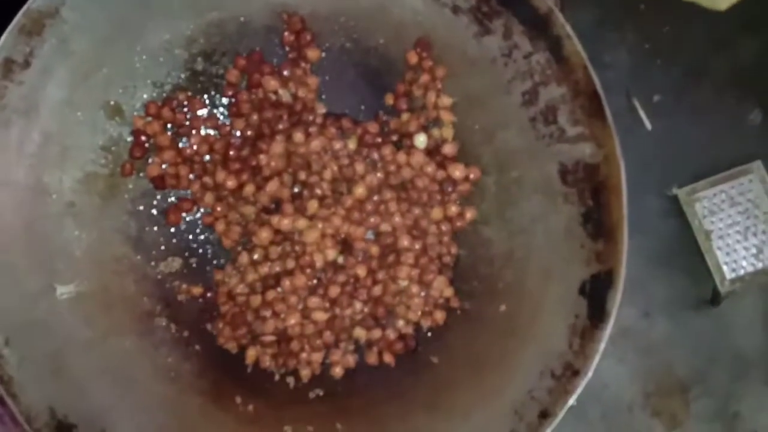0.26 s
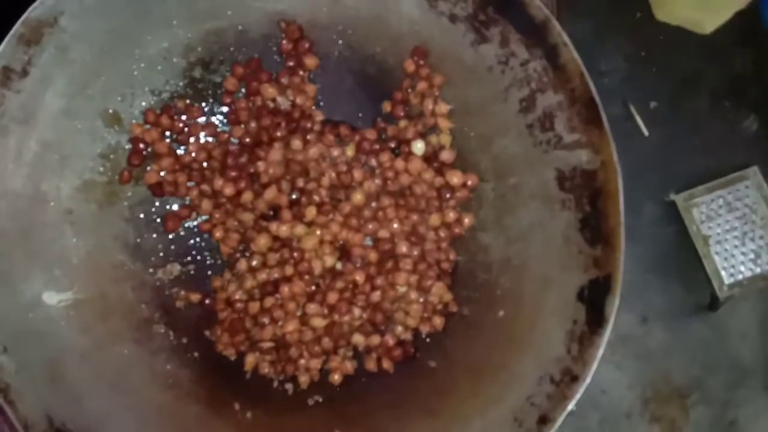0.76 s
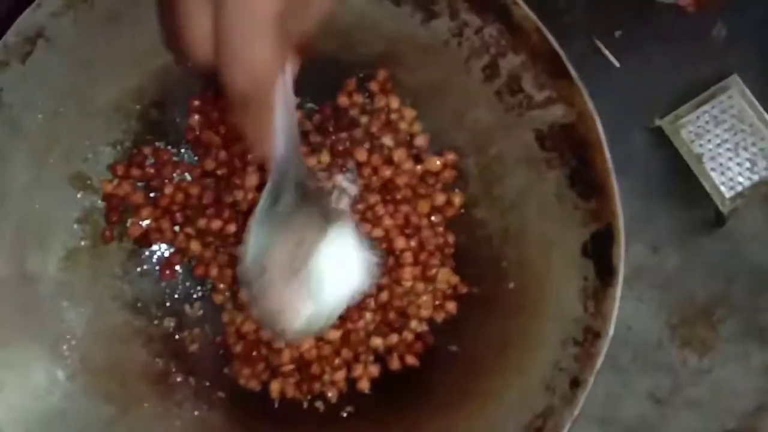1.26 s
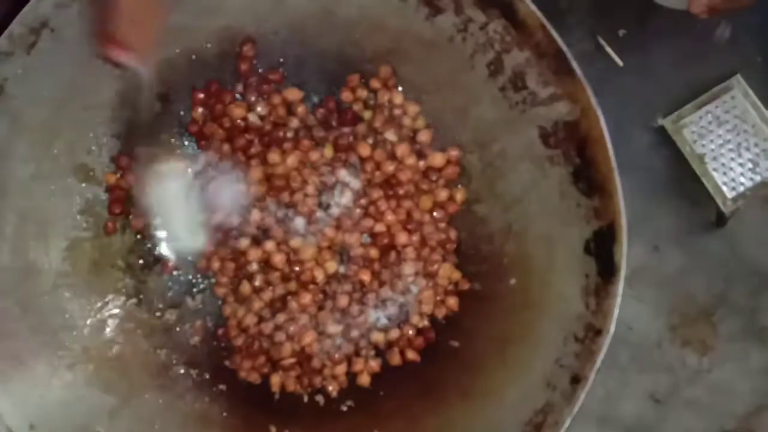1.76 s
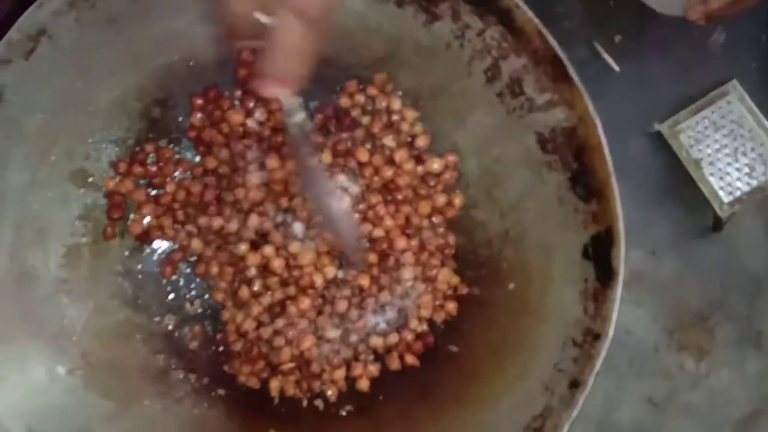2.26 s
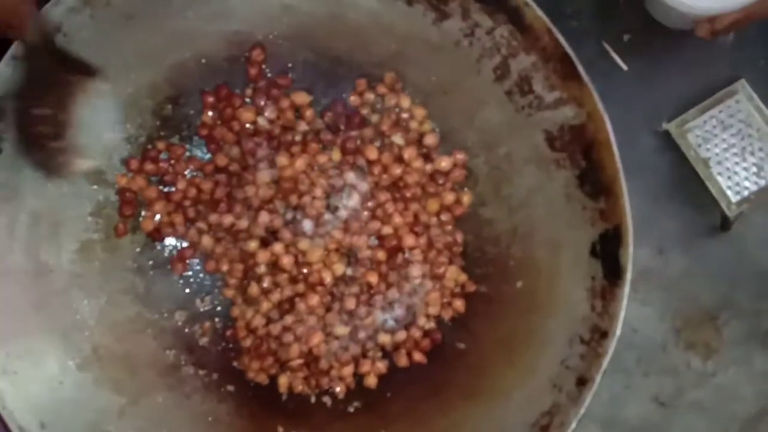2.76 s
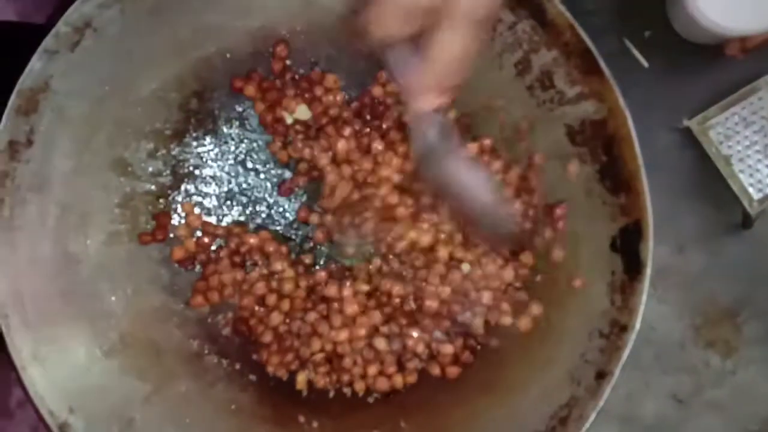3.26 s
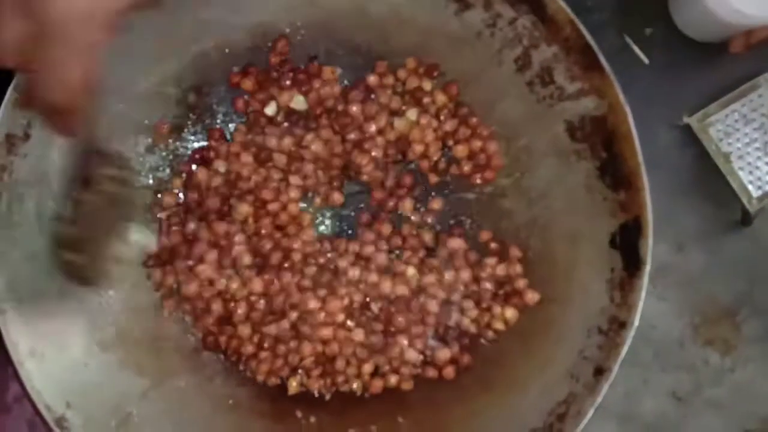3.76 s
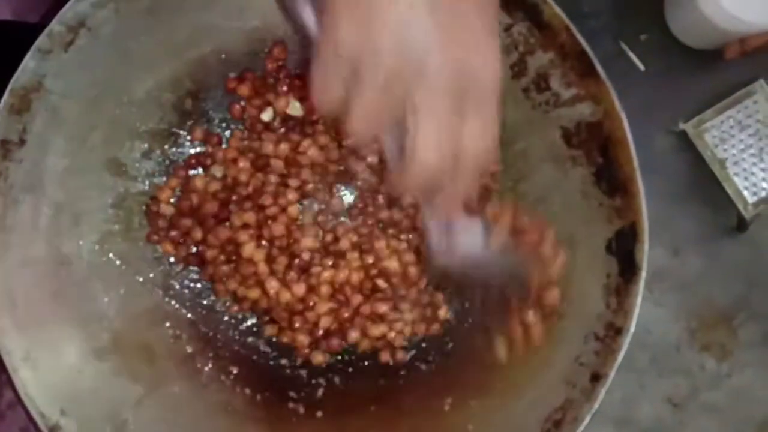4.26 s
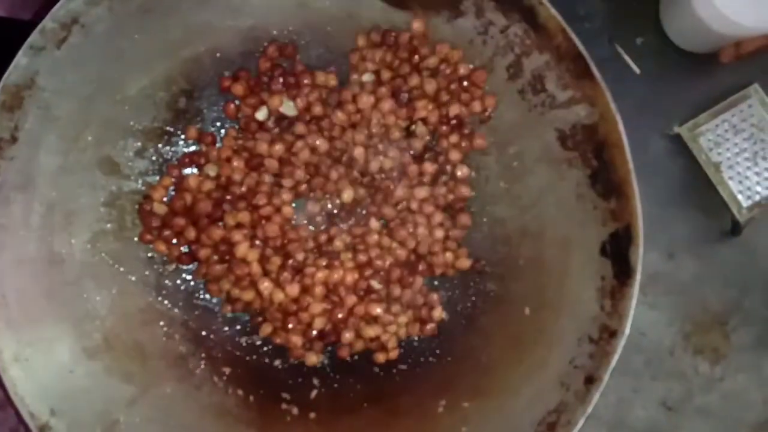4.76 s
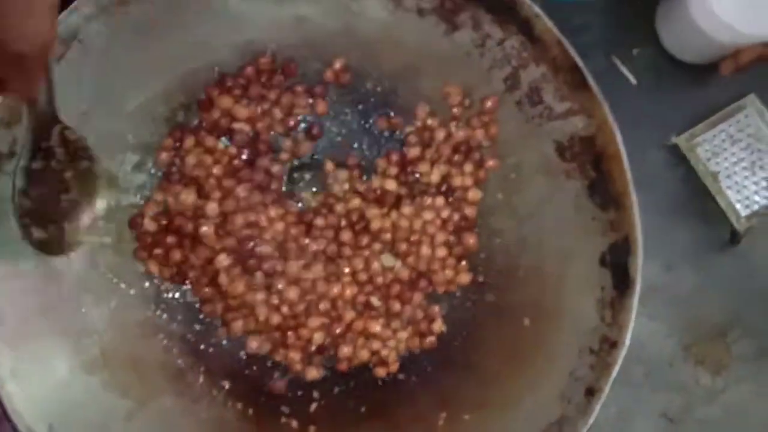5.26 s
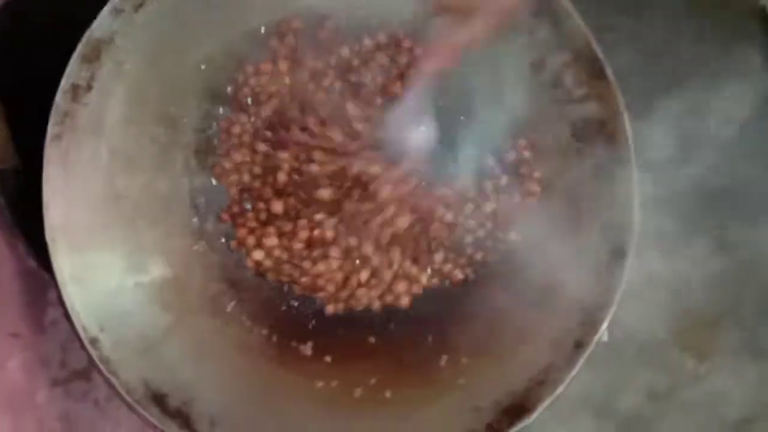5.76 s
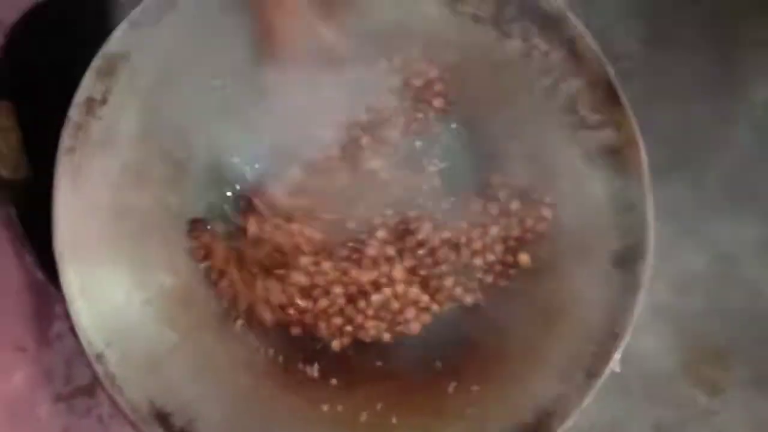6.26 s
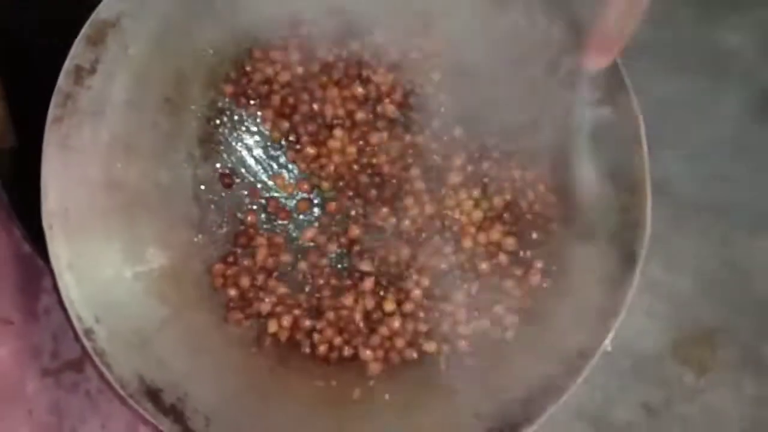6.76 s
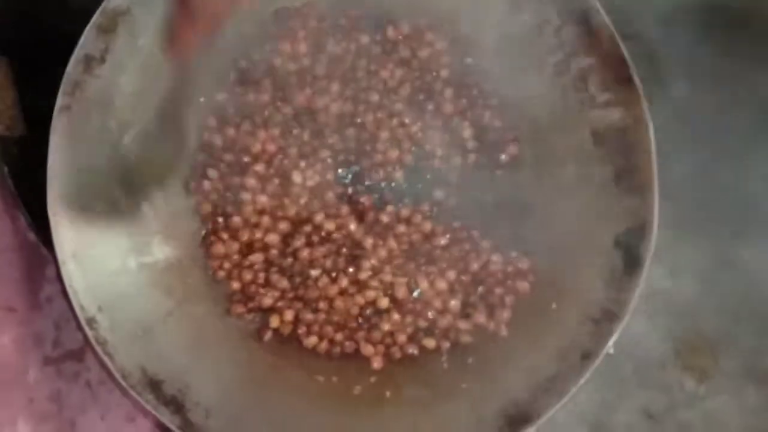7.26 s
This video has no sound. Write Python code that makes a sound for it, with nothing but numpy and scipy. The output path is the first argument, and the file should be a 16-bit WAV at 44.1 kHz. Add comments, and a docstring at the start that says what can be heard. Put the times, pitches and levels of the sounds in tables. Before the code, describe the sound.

Chickpeas sizzle steadily in hot, spitting oil while a spoon occasionally scrapes and clinks against the metal pan.

```python
"""Soaked chickpeas sizzle in hot oil in a steel pan. From the start, steam bubbles burst densely, the
burner rumbles and oil spits. Near 0.7 s the close microphone moves, which changes the sizzle's colour,
and a low hum first swells. From 2.5 s a stirring spoon scrapes now and then, and from 3.2 s the pan
knocks on its stand. The spoon clinks on the steel at 4.5 s, the microphone moves again at 5.4 s,
and the spoon clinks once more at 6.5 s."""
import sys
import numpy as np
from scipy import signal
from scipy.fft import rfft, irfft, next_fast_len
from scipy.io import wavfile
from scipy.ndimage import uniform_filter1d, minimum_filter1d, map_coordinates

SR = 44100
rng = np.random.default_rng(int(sys.argv[2]) if len(sys.argv) > 2 else 0)


def transcribe(u):
    """Save the signal u as a 16-bit wav file named by the first command-line argument.

    u: samples, shape (n,) or (channels, n), limited to [-1, 1]; the rate is SR.
    q: integer samples, one column per channel.
    """
    v = np.clip(np.atleast_2d(u).T, -1, 1)
    q = np.round(v * 32767).astype(np.int16)
    wavfile.write(sys.argv[1], SR, q)


N = 331632

# how loud the sizzle is: t/s, hiss level/dB, drone relative to hiss/dB, fizz relative to hiss/dB
SIZZLE_LEVELS = [(0, -25.5, -13.5, -2.5), (.3, -28.5, -13, -3.5), (.6, -25.5, -14.5, -3),
                 (.67, -26, -16, -2), (.69, -24.5, -10.5, -10), (.95, -22, -13, -10),
                 (1.2, -25.5, -12.5, -8), (1.5, -23.5, -13, -8), (1.9, -24, -11.5, -8),
                 (2.37, -22, -12.5, -8.5), (2.9, -21.5, -12.5, -7), (3.2, -22, -15, -7),
                 (3.8, -22, -14.5, -6), (4.4, -22.5, -12.5, -7), (5.03, -21, -13.5, -7.5),
                 (5.4, -22.5, -13.5, -5), (5.42, -22.5, -12.5, -8), (5.7, -24, -11.5, -5.5),
                 (6.3, -22.5, -14, -5), (7.1, -23.5, -10.5, -3.5), (7.4, -23, -11, -4),
                 (7.52, -24.5, -7.5, -3)]
# colour (strong and weak pitches) of the hiss at each microphone position: f/Hz, relative level/dB
FIRST_HISS = [(1350, -58), (2300, -17), (2810, -6.5), (3060, -8), (3250, -5.5), (4100, -2), (4390, -5),
              (4960, -0.5), (6330, 0), (7400, -4), (8700, -17), (11300, -48), (19100, -120)]
SECOND_HISS = [(1350, -40), (2300, -8.5), (2500, -11), (3320, -7.5), (4010, -1), (4800, 0), (5330, -3),
               (5830, 1), (6160, -1), (6700, -11.5), (7200, -7), (8090, -17), (8700, -15), (11300, -46),
               (19100, -120)]
THIRD_HISS = [(1350, -48), (2300, -18), (2720, -10.5), (2990, -12.5), (3320, -5.5), (3650, -10.5),
              (3860, -5), (3990, -8), (4220, -5), (5240, -9.5), (5960, -2.5), (6200, -1), (6700, -6),
              (7320, -4.5), (8700, -20.5), (11300, -50), (19100, -120)]
# colours of the low pan drone and the high fizz, one list per position: f/Hz, relative level/dB
DRONE_COLOURS = [
    [(400, -45), (600, -22), (1050, -13), (1300, -4), (1500, -6), (1900, -10), (2350, -9)],
    [(400, -45), (600, -16), (880, -13), (1250, -3.5), (1600, -5), (1880, -7), (2350, -4)],
    [(400, -20.5), (600, -10), (880, -10), (1350, -3), (1600, -2.5), (1820, -7), (2010, -2.5), (2350, -8)],
]
FIZZ_COLOURS = [
    [(8500, -1), (11100, -4), (12400, -7), (13900, -9)],
    [(8500, -1), (9500, -1.5), (12400, -9), (13900, -15)],
    [(8500, 1), (9300, 1.5), (12500, -4.5), (13900, -4.5)],
]
# tones of the pan, rung by the frying: f/Hz, width/Hz, boost/dB
PAN_TONES = [(393, 16, 4), (437, 20, 5), (652, 20, 10), (815, 40, 6), (945, 30, 5), (1245, 70, 7),
             (1600, 50, 3)]
# the microphone's opening lifts the highest fizz: f/Hz, boost/dB
PORT_BOOST = [(13900, 0), (14500, 9), (14620, 14), (15500, 15)]
# brief dips (below 0) and surges of sizzle and burner: t/s, change before scaling/dB, width/s
LEVEL_DIPS = [(.065, -2.5, .04), (.105, 3, 0.031), (.18, -6, .06), (.22, 2, .05), (.297, -1.5, .06),
              (.416, 1.5, 0.081), (.47, -3.5, 0.043), (.659, -3.5, 0.034), (.705, 1.5, 0.034),
              (.815, -3.5, 0.068), (.883, 3, 0.061), (1.01, -2, .04), (1.04, 3, 0.028), (1.08, -5.5, 0.045),
              (1.15, -7, 0.036), (1.18, 2.5, .03), (1.21, -4.5, 0.031), (1.255, 1, 0.04),
              (1.327, -6, 0.047), (1.43, -2, .05), (1.477, 1, .04), (1.52, -3, 0.044), (1.625, -7, 0.028),
              (2.12, -3, 0.027), (2.28, -1, 0.1), (2.37, 3, 0.092), (2.43, -4, 0.11), (2.59, 1.1, 0.073),
              (2.774, -4, 0.079), (2.887, 1.8, 0.035), (3.198, -0.5, 0.046), (3.284, 0.5, .06),
              (3.4, -1.5, 0.04), (3.452, 1, 0.045), (3.745, -1.5, 0.032), (3.775, 0, 0.029),
              (3.885, -0.5, 0.033), (4.25, 1.1, 0.095), (4.49, -6, 0.05), (4.704, -3.5, 0.038),
              (4.834, -4, .07), (4.918, -1.5, 0.042), (4.969, -7.5, 0.039), (5.15, -1.5, .04),
              (5.245, -3, 0.064), (5.32, 1.5, 0.045), (5.525, -2.5, 0.062), (5.586, 3, 0.034),
              (5.622, -4, 0.055), (6.092, -3.5, 0.049), (6.157, 1.5, .04), (6.2, -2.5, 0.044),
              (6.495, -3, 0.045), (6.783, 0, 0.031), (6.93, -3, .05), (6.98, 0.5, 0.056), (7.128, -3, 0.03)]
# how loud the burner is: t/s, rumble level/dB, flame level/dB
BURNER_LEVELS = [(0, -49, -46), (.24, -55, -66), (.31, -69, -66), (.65, -69, -68), (.72, -57.5, -54.5),
                 (1.1, -61, -61.5), (1.7, -64.5, -60), (2.05, -62.5, -63), (2.45, -69, -56.5),
                 (2.75, -59, -54), (3.5, -65.5, -57.5), (4.05, -56, -56), (4.9, -60, -59.5),
                 (5.25, -62, -57), (5.45, -53.5, -56.5), (5.85, -47, -52.5), (6.1, -48, -52.5),
                 (6.4, -57.5, -56), (6.9, -55, -57), (7.52, -57, -53)]
# colours of the burner's rumble and flame noise: f/Hz, relative level/dB
RUMBLE_COLOUR = [(20, -24), (45, -22), (62, -14), (76, -5), (88, -10), (100, -3), (108, -6), (119, -1),
                 (145, -7), (157, -1), (175, -6), (215, -18), (300, -60)]
FLAME_COLOUR = [(130, -13), (215, -2.5), (409, 1.5), (443, 3), (560, -6), (620, -2), (810, -23),
                (1360, -120)]
# the flame flares (above 0) or falters: t/s, rumble change/dB, flame change/dB
FLAME_FLARES = [(.05, -2, 2), (.77, 5, 2), (.82, -1, -4), (.92, 12, -2), (1.15, -7, -1), (1.5, 6, -1),
                (1.68, -2, -10), (1.99, 1, 8), (2.07, 5, -3), (2.3, 2, 5), (2.43, -5, -3), (2.61, 13, 5.5),
                (2.79, 1, -6), (2.89, -1, 5), (2.93, -7, -10), (2.97, -3, 3), (3.06, -1, -12), (3.15, 3, 0),
                (3.57, -8, 0), (3.77, -6, -8), (4.19, -6, -2), (4.36, 3, 2), (4.56, 15.5, 5), (4.64, 7, 2),
                (4.75, 9, 3), (4.9, 8, 1), (4.98, -8, -4), (5.05, -1, 13), (5.13, 8, 13), (5.25, -8, -5),
                (5.32, 5, 3), (5.78, -1, -6), (5.96, -8, 1), (6.47, -7, 6), (6.55, 4, 8), (6.74, 6, -1),
                (6.89, -6, -6), (6.99, 2, 3), (7.2, -1, 4), (7.31, -3, -5), (7.41, 3, 3)]
# the loudest oil spits: t/s, level before filtering/dB, rough pitch/Hz
BIG_SPITS = [(.0882, -8.5, 7000), (.0998, -14, 5860), (.1087, -12, 4010), (.135, -14, 5860),
             (.1658, -14, 5770), (.2099, -11, 4170), (.2208, -16, 6370), (.2799, -11, 4440),
             (.3307, -13, 5380), (.4218, -8, 6120), (.4863, -8, 6030), (.5357, -12, 5260),
             (.6752, -13, 6300), (.747, -11, 4500), (.7619, -8, 4100), (.8, -4.5, 5370), (.9789, -10, 5300),
             (.9979, -9, 4130), (1.0469, -11, 5300), (1.1293, -9, 4260), (1.2492, -9, 5640),
             (1.4093, -12, 4640), (1.4732, -6, 4060), (1.5048, -8, 5600), (1.5351, -12, 4260),
             (1.7473, -17, 4010), (1.8344, -5.5, 4570), (1.8984, -10, 4130), (1.9773, -8, 3570),
             (2.0131, -12, 3900), (2.2565, -8, 4700), (2.4076, -5, 4770), (2.7576, -11, 5000),
             (2.8181, -5, 4960), (2.9201, -5, 5400), (3.0197, -9, 5990), (3.143, -9, 4350),
             (3.1777, -8.5, 4100), (3.565, -9, 5950), (3.616, -2, 5510), (3.6477, -11, 4520),
             (3.7313, -8, 5860), (3.7449, -7, 5400), (4.111, -6, 4070), (4.3247, -10, 5680),
             (4.548, -4.5, 4100), (4.6788, -9, 5600), (4.779, -12, 4780), (4.8259, -11, 4600),
             (5.1262, -9, 5850), (5.2207, -9, 5770), (5.2834, -13, 5560), (5.4785, -10, 6160),
             (5.5556, -11, 6230), (5.5871, -5.5, 6070), (5.684, -12.5, 6530), (5.9363, -7, 6290),
             (6.0655, -10, 6160), (7.1621, -15, 3570)]
# swells of the hum: start t/s, length/s, f/Hz, top level/dB
HUM_SWELLS = [(0.678, 0.14, 184, -49), (0.803, .24, 188.5, -41.5), (.95, 0.17, 187, -52),
              (1.17, 0.11, 164, -58), (2.56, .16, 159.5, -54), (3.81, 0.23, 159, -54),
              (3.977, .24, 183, -48), (4.27, 0.12, 185, -38.5), (4.386, .085, 184, -46),
              (6.5, 0.17, 190, -51.5)]
# spoon strokes: start t/s, length/s, rasp f/Hz, rasp level/dB, bowl tone f/Hz, bowl tone level/dB
SPOON_STROKES = [(2.526, 0.11, 4200, -32, 1290, -45), (2.86, 0.064, 4600, -31, 1510, -38),
                 (4.499, 0.074, 4180, -24, 1270, -38), (4.564, .13, 4380, -23, 1223, -29),
                 (5.402, 0.071, 4560, -23.5, 1300, -35.5), (6.522, 0.15, 4400, -28.5, 1320, -43),
                 (7.234, 0.09, 4060, -29.5, 1304, -36), (7.302, 0.077, 4330, -38, 1560, -35),
                 (7.316, 0.17, 4200, -25.5, 2010, -38)]
# ringing tones of the spoon, and of the pan on its stand: f/Hz, relative level/dB, time to fade 60 dB/s
SPOON_TONES = [(1217, -20.5, 0.056), (2110, -26, 0.045), (3910, -11, 0.066), (4070, 5, 0.022),
               (4700, -8, .03), (4830, -5, 0.027), (6730, -10, 0.029), (7150, -12, 0.026)]
STAND_TONES = [(110, -19, 0.14), (285, -3, 0.22), (450, -3, 0.19), (496, 3, 0.11)]
# hits of pan on stand, and of spoon on pan with its bounces: t/s, level added to each tone/dB
PAN_HITS = [(3.19, -42.5), (4.535, -42), (5.03, -57), (5.8, -46), (6.005, -31), (6.56, -44), (7.18, -46)]
SPOON_HITS = [(4.4597, -1), (4.4665, -23), (6.4652, -3.5), (6.4682, -9), (6.472, -6.5)]

MOVES_S = (0.68, 5.41)  # when the microphone moves
TIME = np.arange(N) / SR


def amp(db):
    """Turn decibels into a gain to multiply by."""
    return 10 ** (np.asarray(db) / 20)


def unit(x):
    """Scale a signal to an average power of 1."""
    return x / np.sqrt(np.mean(x ** 2) + 1e-20)


def along(points, hz):
    """Read between (f/Hz, value) points on a log frequency axis."""
    f, value = np.transpose(points)
    return np.interp(np.log(hz + 1), np.log(f + 1), value)


def curves(rows):
    """One value per sample for each column after the time."""
    times, *columns = np.transpose(rows)
    return [np.interp(TIME, times, column) for column in columns]


def wobble(rate):
    """A smooth curve through `rate` random points a second."""
    return map_coordinates(rng.standard_normal(int(N * rate / SR) + 4), [TIME * rate])


def filtered(x, response):
    """Multiply each frequency in x by the gain response(f)."""
    size = next_fast_len(N + SR // 2)
    return irfft(rfft(x, size) * response(np.fft.rfftfreq(size, 1 / SR)), size)[..., :N]


def bumps(times, heights, width_s):
    """Smooth bumps on a flat line; widths are at half height."""
    t = np.arange(0, N + 64, 64) / SR
    hills = np.exp(-4 * np.log(2) * ((t[:, None] - times) / width_s) ** 2)
    return np.interp(TIME, t, hills @ heights)


def patchy(depth_db):
    """White noise with random louder and softer patches in time and pitch."""
    spectrum = signal.stft(rng.standard_normal(N), nperseg=256)[2]
    patches = unit(uniform_filter1d(rng.standard_normal(spectrum.shape), size=8, axis=0))
    patches = unit(uniform_filter1d(patches, size=8, axis=1))
    return unit(signal.istft(spectrum * amp(depth_db * patches), nperseg=256)[1][:N])


def bursts(rate, spread_db):
    """Random clicks of uneven size, about `rate` a second, each a very quick rising sweep."""
    hits = rng.random(N) < rate / SR
    sizes = amp(spread_db * np.minimum(rng.exponential(size=N), 3))
    sweep = lambda f: np.exp(-1j * np.pi * f * f * 2.5e-7)  # higher pitches come later
    return unit(filtered(hits * rng.choice([-1, 1], N) * sizes, sweep))


def boiling(click_db, clump_db):
    """Hiss with bursting bubbles on top, coming in clumps."""
    bubbles = patchy(depth_db=1.5) + amp(click_db) * bursts(rate=700, spread_db=5)
    clumps = 0.39 * wobble(35) + wobble(80) + 1.4 * wobble(160)
    return bubbles * amp(clump_db * clumps)


def sizzle():
    """Steam bubbles make a low pan drone, a hiss and a high fizz, coloured by the microphone's place."""
    level_db, drone_db, fizz_db = curves(SIZZLE_LEVELS)
    dip_db = bumps(*np.transpose(LEVEL_DIPS))
    levels = [level_db + drone_db + 0.89 * dip_db + 1.07 * wobble(14),
              level_db + 0.83 * dip_db,
              level_db + fizz_db + 0.89 * dip_db + 0.67 * wobble(14)]
    boil = boiling(click_db=-5.5, clump_db=0.54)
    spray = boiling(click_db=1.0, clump_db=0.74) + 0.99 * boil
    ring = lambda f: 1 + sum((amp(db) - 1) / (1 + (2 * (f - hz) / width) ** 2)
                             for hz, width, db in PAN_TONES)
    drone_hz, hiss_hz, fizz_hz = 360, 2350, 8600  # where each band starts
    colours = zip(DRONE_COLOURS, (FIRST_HISS, SECOND_HISS, THIRD_HISS), FIZZ_COLOURS)
    out = np.zeros(N)
    for position, (low, middle, top) in enumerate(colours):
        here = np.searchsorted(MOVES_S, TIME) == position
        drone = filtered(boil, lambda f: amp(along(low, f)) * ring(f) * (f > drone_hz) * (f < hiss_hz))
        hiss = filtered(boil, lambda f: amp(along(middle, f)) * (f >= hiss_hz) * (f < fizz_hz))
        fizz = filtered(spray, lambda f: amp(along(top, f) + along(PORT_BOOST, f)) * (f >= fizz_hz))
        for band, db in zip((drone, hiss, fizz), levels):
            out[here] += amp(db[here]) * unit(band[here])
    return out


def burner():
    """The swirling flame makes a low rumble and a higher rush; both gust and flare."""
    times, *flares = np.transpose(FLAME_FLARES)
    dip_db = bumps(*np.transpose(LEVEL_DIPS))
    gusts_db, dip_shares = (0.6, 1.5), (0.78, 0.9)  # each pair: rumble, flame
    bands = zip(curves(BURNER_LEVELS), flares, gusts_db, dip_shares, (RUMBLE_COLOUR, FLAME_COLOUR))
    out = np.zeros(N)
    for level_db, flare_db, gust_db, share, colour in bands:
        noise = unit(filtered(rng.standard_normal(N), lambda f: amp(along(colour, f))))
        change_db = bumps(times, flare_db, width_s=0.054) + share * dip_db + gust_db * wobble(15)
        out += amp(level_db + change_db) * noise
    return out


def oil_spits(small_count=40, small_db=-15, small_hz=5200, rise_s=0.000097, fade_s=0.0035):
    """Each droplet bursts as a short rising chirp with a crack; smaller ones come at random."""
    out, t = np.zeros(N + SR), np.arange(300) / SR
    when, size, pitch = rng.random((3, small_count))
    small_spits = np.c_[.01 + when * N / SR, small_db + 6 * (size - .5), small_hz * 1.6 ** (pitch - .5)]
    shape = amp(-60 * t / fade_s) * (1 - np.exp(-t / rise_s))
    shape /= shape.max()
    for start, db, hz in [*BIG_SPITS, *small_spits]:
        chirp = np.sin(2 * np.pi * hz * t * (0.913 + 80 * t))
        crack = 0.32 * rng.standard_normal(len(t))
        out[round((start - .0004) * SR):][:len(t)] += amp(db) * shape * (chirp + crack)
    # tiny drops make no bass; the very top is softened too
    return filtered(out[:N], lambda f: 1 / (1 + (2600 / (f + 1)) ** 6) / (1 + (f / 11000) ** 4))


def hum(waver=0.0047):
    """A pure low tone swells and dies away several times, its pitch wavering slightly."""
    out = np.zeros(N)
    wavering_time = np.cumsum(1 + waver * wobble(15)) / SR
    for start, length, hz, db in HUM_SWELLS:
        swell = np.abs(np.sin(np.pi * np.clip((TIME - start) / length, 0, 1))) ** 0.98
        out += swell * amp(db) * np.sqrt(2) * np.sin(2 * np.pi * hz * wavering_time)
    return out


def spoon_scrapes():
    """Rubbing makes the spoon rasp and sing a little, and rings one tone of the bowl."""
    peak = lambda f, hz, width: 1 / np.sqrt(1 + (2 * (f - hz) / width) ** 4)
    sings = lambda f: 1 + 1.5 * sum(peak(f, hz, 1.7 / fade_s) for hz, _, fade_s in SPOON_TONES)
    grit = bursts(rate=4000, spread_db=-1.5)
    out = np.zeros(N)
    for start, length, rasp_hz, rasp_db, tone_hz, tone_db in SPOON_STROKES:
        stroke = np.sqrt(np.sin(np.pi * np.clip((TIME - start) / length, 0, 1)))
        rasp = unit(filtered(grit, lambda f: peak(f, rasp_hz, width=880) * sings(f)))
        tone = unit(filtered(grit, lambda f: peak(f, tone_hz, width=96)))
        out += stroke * (amp(rasp_db) * rasp + amp(tone_db) * tone)
    return out


def struck(hits, tones):
    """Each hit rings the same fading tones, at slightly different strengths."""
    out, t = np.zeros(N + SR), np.arange(SR // 4) / SR
    rise = 1 - np.exp(-t * tones[0][0])  # builds over about one cycle of the lowest tone
    for start, db in hits:
        ring = sum(amp(level + rng.normal(0, 0.72) - 60 * t / fade_s) * np.sin(2 * np.pi * hz * t)
                   for hz, level, fade_s in tones)
        out[round(start * SR):][:len(t)] += amp(db) * ring * rise
    return out[:N]


def pan_knocks():
    """The pan bumps its stand with a dull, low ring."""
    return struck(PAN_HITS, STAND_TONES)


def spoon_clinks():
    """The spoon strikes the steel and bounces, ringing brightly."""
    return struck(SPOON_HITS, SPOON_TONES)


def scene():
    """Add up all the sounds, the same on the left and right."""
    mono = sizzle() + burner() + oil_spits() + hum() + spoon_scrapes() + pan_knocks() + spoon_clinks()
    return np.array([mono, mono])


def record(dry, ceiling=0.57, top_hz=15490):
    """A limiter turns the sound down just before loud hits; nothing above top_hz gets through."""
    needed_gain = np.minimum(1, ceiling / (np.abs(dry[0]) + 1e-9))
    smooth_gain = uniform_filter1d(minimum_filter1d(needed_gain, size=1000), size=300)
    return filtered(dry * smooth_gain, lambda f: f < top_hz)


dry = scene()
out = record(dry)
transcribe(out)
```